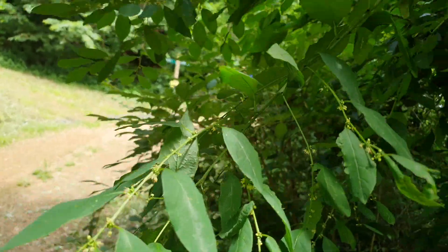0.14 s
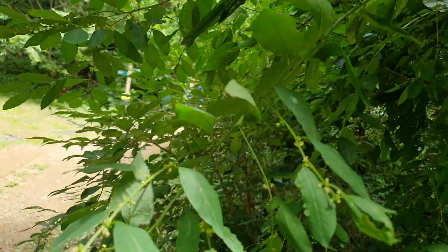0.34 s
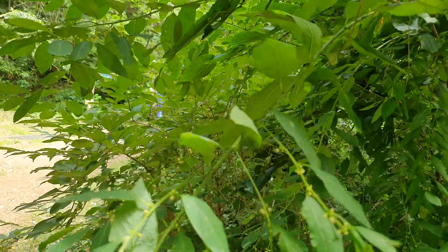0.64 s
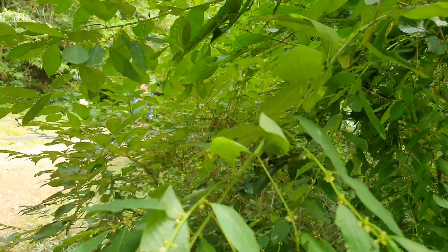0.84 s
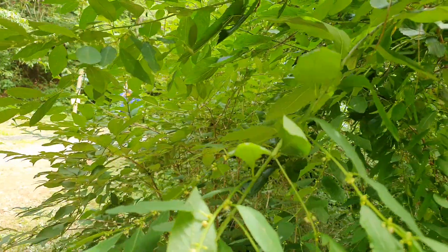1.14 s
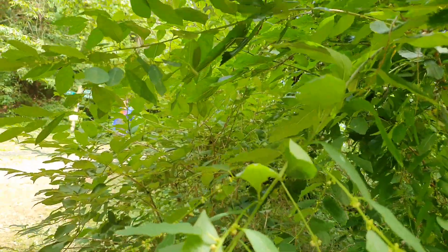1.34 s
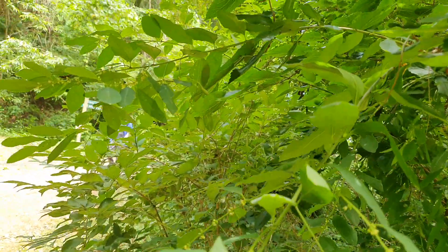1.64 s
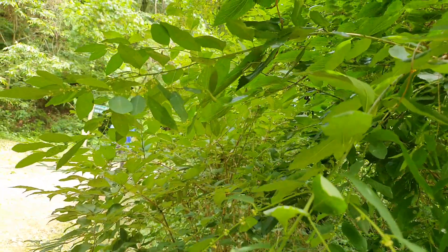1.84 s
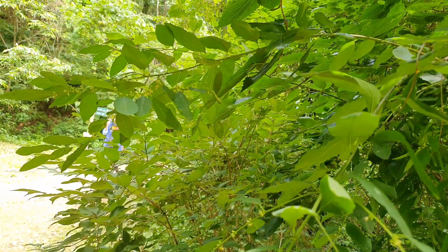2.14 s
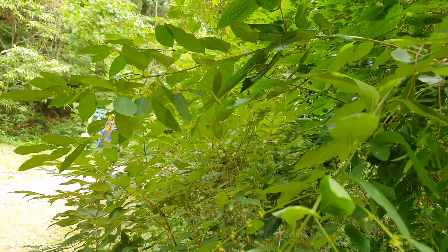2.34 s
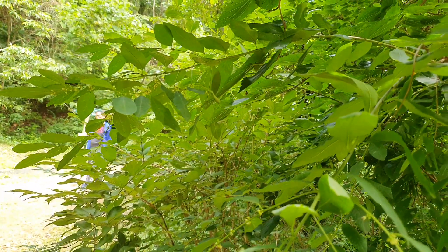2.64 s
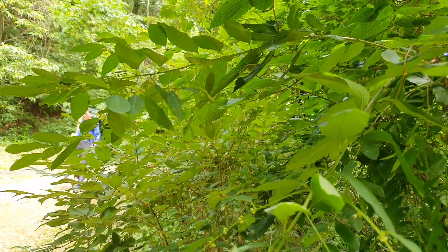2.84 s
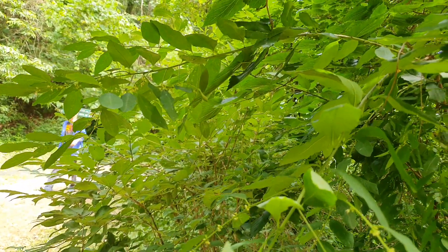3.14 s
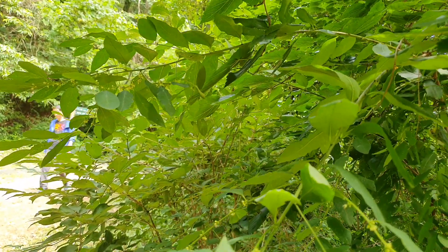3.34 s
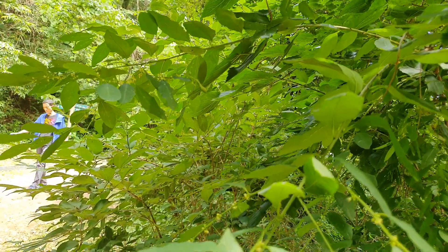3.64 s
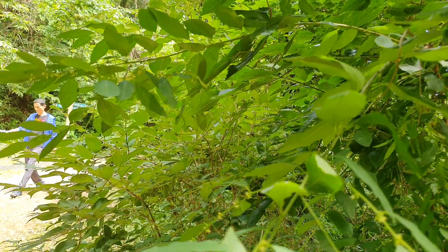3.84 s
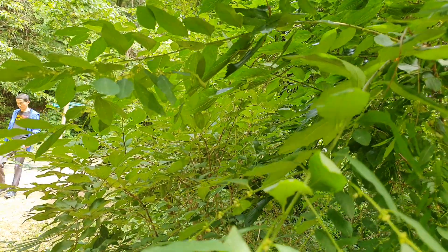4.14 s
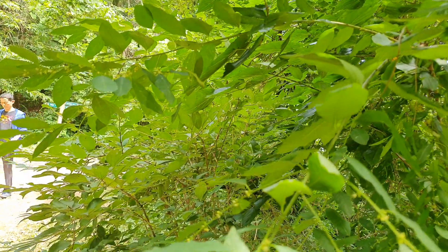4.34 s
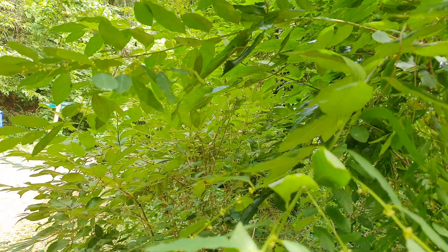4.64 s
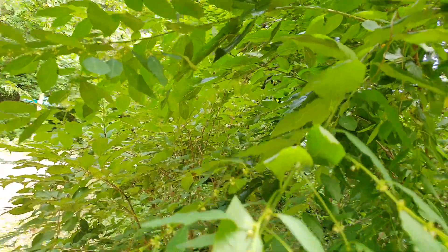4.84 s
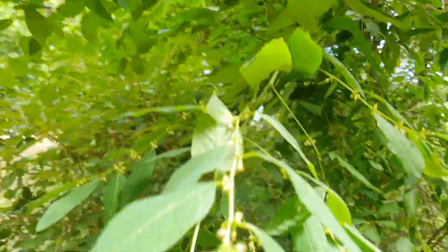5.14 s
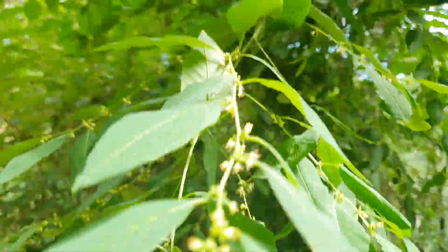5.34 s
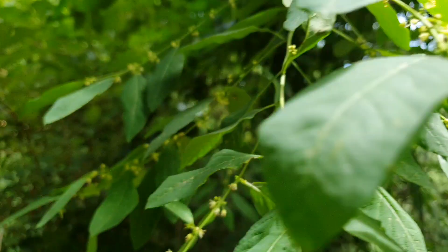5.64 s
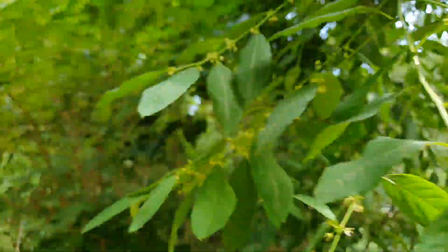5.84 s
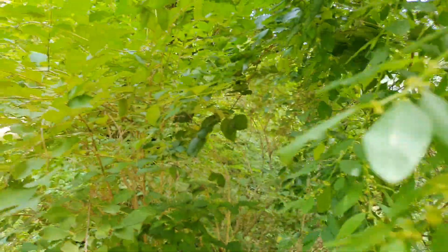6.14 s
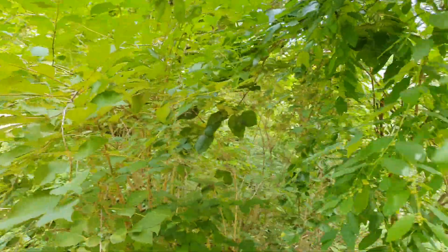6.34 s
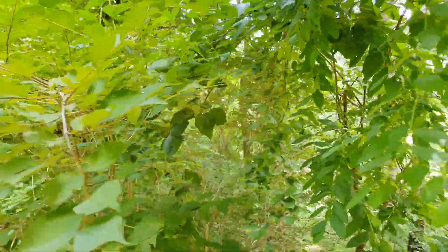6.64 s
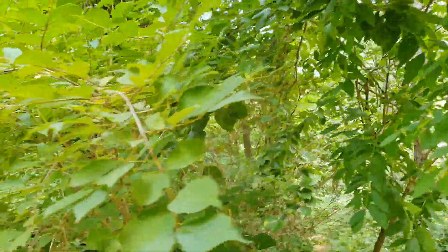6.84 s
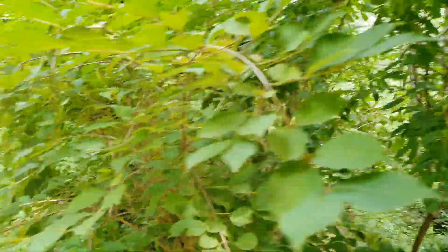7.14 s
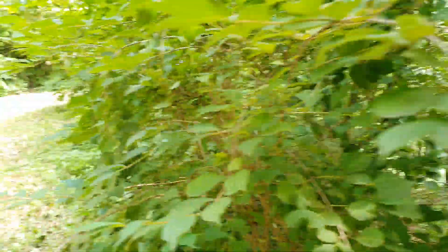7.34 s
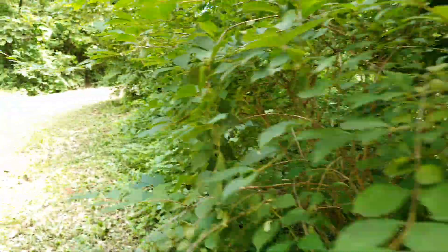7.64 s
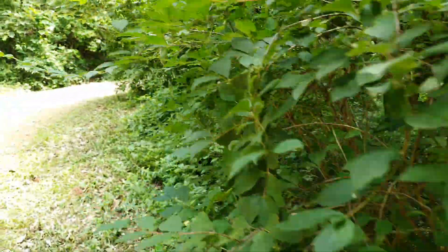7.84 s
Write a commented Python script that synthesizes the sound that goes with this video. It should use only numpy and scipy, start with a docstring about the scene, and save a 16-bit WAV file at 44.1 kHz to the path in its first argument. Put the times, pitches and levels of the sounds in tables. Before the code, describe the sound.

In a summer wood, far cicadas drone steadily at several pitches while one nearby, to the left of the microphone, pulses with a fast, bright rattle. Brief high calls come from farther trees, and a distant road rumbles faintly. From about halfway, someone shifts on a dirt path with soft thuds, gritty scuffs and cracking twigs. The close cicada tires and slows at the end.

```python
"""A cicada close on the left rattles in quick beats over its own buzz, clicking its ribbed timbals and
pumping its hollow abdomen; near the end it tires and slows. Around it the summer wood drones with a far
chorus, a thin trill and short calls, over the low rumble of a distant road. Mostly in the second half,
the listener shifts on the dirt path: soft scuffs and footfalls, grit and snapping twigs."""
import sys
import numpy as np
from scipy import signal
from scipy.fft import rfft, irfft, next_fast_len
from scipy.io import wavfile

SR = 44100
rng = np.random.default_rng(int(sys.argv[2]) if len(sys.argv) > 2 else 0)


def transcribe(signal):
    """Save signal, clipped to [-1, 1], as a 16-bit WAV file at the path in sys.argv[1]."""
    frames = np.atleast_2d(signal).T
    limited = np.clip(frames, -1, 1)
    pcm = np.round(limited * 32767).astype(np.int16)
    wavfile.write(sys.argv[1], SR, pcm)


N = 353241


# Rattle resonances; pan is always left minus right: f/Hz, width/Hz, relative level/dB, pan/dB
RATTLE_MODES = [(3730, 470, -8.5, 1), (5520, 610, -8.5, 9), (7750, 180, -9, 22), (8500, 180, -6.5, 18),
                (11530, 1500, -9.5, 5), (12100, 820, -13.5, 10.5), (14100, 920, -18, 15)]
# Rattle held before the beats begin and under the last, slowing beats:
# centre t/s, length/s, relative level/dB
HELD_RATTLE = [(0.07, 0.24, -54), (7.802, 0.59, -51.5)]
# Fader on the 8 kHz ring, which depends on where the listener stands: t/s, relative level/dB
RING_FADER = [(0, -17), (1, -4), (2, -6), (3, -5.5), (4.8, -5.5), (5.3, 3.5), (6.3, -3), (7.4, -1), (8, -9)]
# Resonances of the unbroken buzz: f/Hz, width/Hz, relative level/dB, pan/dB
BUZZ_BANDS = [(5665, 290, -89.5, 10.5), (7804, 588, -82.5, 16.5), (11210, 1300, -92, 6),
              (13500, 1800, -101, 15)]
# Fader on the buzz: t/s, gain/dB
BUZZ_FADER = [(0, 3.5), (.15, 3.5), (.3, 0), (.75, -0.4), (1, 1), (4.7, 0), (5.5, 1), (6.8, -1.2), (8, 0)]
def near_cicada(beats, rattle_db=-3.0, ring_db=-4.5, ring_hz=8230, ring_width_hz=520, ring_pan_db=14):
    """Over a steady buzz, each beat swells a bright rattle and sets the timbals ringing."""
    pump = pumping(beats, rise_s=0.0095, fall_s=0.011, echo_db=-9.0, echo_t60=0.19)
    clicks = timbals(click_hz=478, jitter=0.12, direct=0.2, sharpness=2.4)
    rattle = np.hypot(pump, held(HELD_RATTLE)) * amp(rattle_db) * unit(resonate(clicks, RATTLE_MODES))
    clicks = timbals(click_hz=462, jitter=0.11, direct=0.23, sharpness=1.3)
    ring_mode = [(ring_hz, ring_width_hz, 0, ring_pan_db)]
    ring = pump * amp(curve(RING_FADER) + ring_db) * unit(resonate(clicks, ring_mode))
    clicks = timbals(click_hz=233.3, jitter=0.043, direct=0.22, sharpness=1.0)
    buzz = amp(curve(BUZZ_FADER) + 0.26 * wobble(25)) * resonate(clicks, BUZZ_BANDS)
    return foliage(rattle + ring + buzz)


def timbals(click_hz, jitter, direct, sharpness):
    """Buckling timbal ribs click; a share of the power arrives direct, the rest as hiss off the leaves."""
    phase = np.cumsum(click_hz * (1 + jitter * wobble(90))) / SR
    decay = np.exp(-sharpness * (phase % 1))
    clicks = unit(decay * amp(2.0 * wobble(300)) * rng.standard_normal(N))
    return np.sqrt(direct) * both_ears(clicks) + np.sqrt(1 - direct) * rng.standard_normal((2, N))


def beat_series(first_pair_s=0.4832, pair_s=0.15045, weak_lag_s=0.0755, strong_db=-44, weak_db=-44.5):
    """Strong-weak pairs of beats that slow as the cicada tires: rows of t/s, relative level/dB."""
    beats = [(0.248, strong_db)]  # one lone beat leads in
    s = first_pair_s
    while s < N / SR:
        stretch_s = 0.001651 * s + 0.08032 * np.exp((s - 8.0) / 0.853)  # slow creep, then a steep drag
        strong_scatter_db, weak_scatter_db = 0.6 * rng.standard_normal(2)
        beats.append((s, strong_db + strong_scatter_db))
        # the weak beat falls later and fades as the period stretches
        beats.append((s + weak_lag_s + 0.17 * stretch_s, weak_db - 38 * stretch_s + weak_scatter_db))
        s += pair_s + stretch_s
    return beats


def pumping(beats, rise_s, fall_s, echo_db, echo_t60):
    """Envelope of the abdomen's beats, each given a tail by the trees."""
    t = np.arange(-SR // 20, SR // 5) / SR
    swell = np.exp(-(t / np.where(t < 0, rise_s, fall_s)) ** 2)
    echo = amp(echo_db - 60 * np.abs(t) / echo_t60) ** 2 * np.clip(t / fall_s, 0, 1)
    power = np.zeros(N)
    for s, db in beats:
        add(power, s + t[0], amp(db) ** 2 * (swell + echo))
    return np.sqrt(power)


def foliage(x, depth_db=3.5, step_hz=45, places=5):
    """Paths off leaves and ground interfere: a fine spectral ripple that shifts as the listener moves."""
    out = np.zeros((2, N))
    for place in np.eye(places):
        knots = rng.standard_normal((2, int(SR / step_hz)))
        ripple = lambda f: np.array([np.interp(f / step_hz, np.arange(len(k)), k) for k in knots])
        crossfade = np.interp(np.arange(N), np.linspace(0, N, places), place)
        out += filtered(x, lambda f: unit(amp(depth_db * ripple(f)))) * crossfade
    return out


def both_ears(x, lag_s=0.00036):
    """The near cicada's direct sound reaches the right ear late."""
    return np.array([x, np.roll(x, round(lag_s * SR))])


# Fader on the chirp under each beat: t/s, relative level/dB
CHIRP_FADER = [(0, -11), (.8, -9), (6.7, -8.5), (8, -19)]
def chirps(beats, gain_db=-4.0, pan_db=-1.0, pitch_hz=2790, drift_hz=14, scatter_db=-3):
    """The hollow abdomen sounds a short low note at every beat; the leaves scatter part of it."""
    pump = pumping(beats, rise_s=0.017, fall_s=0.0084, echo_db=-7, echo_t60=0.15)
    pitch = pitch_hz + drift_hz * wobble(15)
    scattered = np.array([whistle(pitch, blur_hz=54.7) for ear in range(2)])
    note = unit(both_ears(whistle(pitch, blur_hz=42)) + amp(scatter_db) * scattered)
    swell_db = np.cos(2 * np.pi * (np.arange(N) / SR - 0.64) / 1.8)  # 1 dB up and down every 1.8 s
    return pump * amp(curve(CHIRP_FADER) + gain_db + swell_db) * sides(pan_db) * note


# Drone bands of the far chorus: f/Hz, width/Hz, density/(dB per Hz), pan/dB
CHORUS_BANDS = [(2650, 404, -85.5, -0.5), (3250, 680, -83, -2), (4800, 640, -97, -21.5),
                (5210, 874, -83.5, -0.5), (6300, 840, -99.5, 17), (8240, 320, -92.5, -7),
                (11600, 1300, -95.5, -1)]
# Fader on the chorus: t/s, relative level/dB
CHORUS_FADER = [(0, 2), (5.2, 2), (6.6, 0.5), (8, 1)]
def chorus(sway_db=0.93):
    """Many far cicadas merge into droning bands that sway a little."""
    fader_db = curve(CHORUS_FADER)
    sway = sway_db * np.array([wobble(5.1), wobble(12)])
    return amp(fader_db - fader_db.mean() + sway) * resonate(rng.standard_normal((2, N)), CHORUS_BANDS)


# Swells that lift the trill out of the chorus: centre t/s, length/s, level/dB
TRILL_PHRASES = [(1.8, .2, -55.5), (3.06, .18, -56.5), (3.36, .08, -56.5), (4.96, .14, -55.5),
                 (5.95, 0.099, -55), (6.57, .08, -55), (7.17, 0.16, -56.5), (7.96, .08, -56)]
def trill(bed_db=-64, pan_db=-3, fade_db=4, pitch_hz=3380, drift_hz=35):
    """A thin, far trill wavers and swells in phrases; each ear gets its own blur and flutter."""
    bed = amp(bed_db + fade_db * np.tanh(wobble(7)))
    pitch = pitch_hz + drift_hz * wobble(9)
    voice = np.array([amp(3.3 * wobble(70)) * whistle(pitch, blur_hz=30.25) for ear in range(2)])
    return np.hypot(bed, held(TRILL_PHRASES)) * sides(pan_db) * voice


# Louder calls from farther trees: centre t/s, length/s, f/Hz, width/Hz, level/dB, pan/dB
TREE_CALLS = [(0.377, 0.078, 3254, 55, -43.5, 4), (0.574, .23, 3420, 350, -54, 0),
              (1.364, 0.11, 3240, 40, -52, -1), (1.47, .23, 3420, 250, -55, -4),
              (1.628, 0.13, 3100, 50, -54, -2), (2.329, .4, 3330, 500, -52, -4),
              (3.58, .25, 3400, 420, -49.5, -1), (4.277, 0.28, 3140, 376, -53, -7),
              (4.701, 0.13, 3600, 280, -53, -7), (5.367, 0.13, 3250, 45, -53.5, -3),
              (5.527, 0.28, 3500, 260, -55.5, -3), (6.2, 0.4, 3200, 350, -53.5, 1)]
def far_calls(crisp_db=-37):
    """Short shrill notes, smeared by the wood into narrow bands; fainter calls have softer edges."""
    out = np.zeros((2, N))
    for s, length, hz, width, db, pan in TREE_CALLS + faint_calls():
        n = int(length * SR)
        note = unit(filtered(rng.standard_normal((2, n)), lambda f: hump(f, hz, width)))
        taper = np.clip(0.46 * (crisp_db - db) / 12, 0.1, 1)
        add(out, s - length / 2, amp(db) * sides(pan) * note * signal.windows.tukey(n, taper))
    return out


def faint_calls(count=12, length_s=0.15, pitch_hz=3320, width_hz=60, level_db=-57.5, pan_db=-3):
    """Weaker singers take turns at loose intervals, each a little different: rows like TREE_CALLS."""
    turns = (np.arange(count) + rng.random(count)) * N / SR / count
    return [(s, length_s * amp(2 * length), pitch_hz + 130 * pitch, width_hz * amp(6.4 * width),
             level_db + level, pan_db + 3 * pan)
            for s, (length, pitch, width, level, pan) in zip(turns, rng.standard_normal((count, 5)))]


# Scuffs on dirt and brushes of leaves: centre t/s, length/s, f/Hz, level/dB
SOLE_SCUFFS = [(4.448, 0.061, 780, -66.5), (5.043, .11, 1700, -62.5), (5.499, 0.058, 1170, -52.5),
               (5.673, 0.1, 1100, -63), (5.889, .015, 800, -58), (6.078, 0.065, 1280, -60.5),
               (6.08, .035, 10000, -53), (6.185, 0.051, 1930, -59.5), (6.485, .04, 1320, -59),
               (6.827, 0.15, 2660, -55.5), (7.514, 0.052, 684, -62)]
def scuffs(log_width=0.61, clump_db=3.5):
    """A sole drags over grit: clumps of tiny grains in a broad band."""
    out = np.zeros((2, N))
    clumps = amp(clump_db * wobble(350))
    for s, length, hz, db in SOLE_SCUFFS:
        n = int(2 * length * SR)
        grains = wide_noise(n) * np.roll(clumps, -int(s * SR))[:n]
        rub = unit(filtered(grains, lambda f: np.exp(-(np.log((f + 1) / hz) / log_width) ** 2 / 2)))
        add(out, s - length, amp(db) * rub * np.hanning(n))
    return out


# Twigs breaking underfoot: t/s, level/dB, knock f/Hz
TWIG_SNAPS = [(.59, -53, 1300), (4.786, -48, 1830), (5.007, -41, 2040), (5.299, -44.5, 1720),
              (5.476, -39, 990), (5.489, -39, 855), (5.502, -37, 1500), (5.727, -39, 1260),
              (5.868, -44, 1400), (5.885, -40.5, 402), (6.068, -42, 1900), (6.258, -29, 1004),
              (6.458, -40.5, 1390), (6.911, -42, 1870), (7.4, -46.5, 586), (7.497, -37.5, 594),
              (7.523, -44.5, 695)]
def snaps(wood_t60=0.013, crack_db=-1.5, crack_t60=0.042, fibres_db=4, hardness=0.65, attack_s=0.00021):
    """Dry twigs give way: a short woody knock and a crackle of fibres, brighter the harder the break."""
    out, t = np.zeros((2, N)), np.arange(SR // 16) / SR
    hardest_db = max(db for s, db, hz in TWIG_SNAPS)
    ear_phase = np.array([[1], [-1]]) * np.pi / 8  # the knock meets the ears slightly out of step
    for s, db, hz in TWIG_SNAPS + grit_ticks():
        phase = 2 * np.pi * hz * t
        wood = np.sin(phase + ear_phase) + 0.42 * np.sin(1.32 * phase + ear_phase)
        knock = wood * amp(-60 * t / wood_t60)
        flicker = amp(fibres_db * np.sin(np.cumsum(rng.normal(0, 0.16, len(t)))))
        fibres = flicker * rng.standard_normal((2, len(t)))
        crackle = unit(filtered(fibres, lambda f: f / np.hypot(f, 6000)))  # high-pass at 6 kHz
        crack = amp(crack_db + hardness * (db - hardest_db) - 60 * t / crack_t60) * crackle
        add(out, s, amp(db) * (knock + crack) * (1 - np.exp(-t / attack_s)))
    return out


# Soft footfalls: t/s, level/dB, f/Hz
FOOTFALLS = [(0.548, -53, 302), (5.58, -51, 200), (5.656, -48, 215), (5.818, -45, 110), (6.067, -42, 90),
             (6.22, -45, 214), (7.42, -40.5, 54.7)]
def footfalls(t60=0.057, attack_s=0.00076):
    """Weight settles on the soft ground with a low, damped thud."""
    out, t = np.zeros(N), np.arange(SR // 5) / SR
    for s, db, hz in FOOTFALLS:
        envelope = amp(db - 60 * t / t60) * (1 - np.exp(-t / attack_s))
        add(out, s, envelope * np.sin(2 * np.pi * hz * t))
    return out


# Grit and dry leaves stirring underfoot: t/s, level/dB
LITTER_STIR = [(0, -84.5), (.6, -64.5), (1.1, -76), (4.3, -78), (4.9, -68.5), (6.2, -64), (7, -68),
               (7.6, -60.5), (8, -65)]
# Colour of the crackle: f/Hz, width/Hz, relative level/dB, pan/dB
LITTER_BANDS = [(480, 350, -1, -1), (804, 89, -9, 12), (1880, 1700, 1.5, -1.5)]
def litter(spiky_db=4.0):
    """Grit and dry leaves on the path stir in a fine crackle."""
    grains = amp(spiky_db * wobble(260)) * wide_noise(N)
    return amp(curve(LITTER_STIR)) * unit(resonate(grains, LITTER_BANDS, low_cut_hz=200))


def grit_ticks(count=16, over_litter_db=17, pitch_hz=1000, ceiling_db=-47):
    """Small stones tick at random, more often and louder where the litter stirs: rows like TWIG_SNAPS."""
    stir_db = curve(LITTER_STIR)
    chance = np.cumsum(np.sqrt(amp(stir_db)))
    onsets = np.searchsorted(chance, chance[-1] * rng.random(count))
    return [(i / SR, min(stir_db[i] + over_litter_db, ceiling_db) + scatter_db, pitch_hz * amp(3 * detune))
            for i, (scatter_db, detune) in zip(onsets, rng.standard_normal((count, 2)))]


# EQ of the road's rumble: f/Hz, relative level/dB
ROAD_EQ = [(53, -68), (90, -15.5), (124, -0.5), (178, -2), (202, -4.5), (242, -16), (281, -10),
           (346, -25.5), (450, -39), (580, -71), (990, -120)]
# Far vehicle pass-bys: nearest t/s, time to half power/s, level/dB
PASS_BYS = [(0.25, 0.27, -62.5), (3.1, 0.57, -56)]
def road(steady_db=-63.5, hum_hz=72, hum_db=-71):
    """A distant road rumbles and faintly hums; the rumble swells as vehicles pass."""
    t = np.arange(N) / SR
    passing_power = sum(amp(db) ** 2 / (1 + ((t - s) / half_s) ** 2) for s, half_s, db in PASS_BYS)
    rumble = np.sqrt(amp(steady_db) ** 2 + passing_power) * unit(diffuse(ROAD_EQ))
    hum_level = amp(hum_db + 2.4 * wobble(2.85))
    hum = unit(np.sin(2 * np.pi * hum_hz * t + 1.8 * wobble(4.4)))
    return rumble + hum_level * hum


# Air tone of the wood: f/Hz, density/(dB per Hz)
AIR_TONE = [(20, -106), (40, -95), (58, -84), (73, -79.5), (95, -86.5), (200, -90.5), (400, -105),
            (750, -100.5), (1000, -104), (1400, -102), (2000, -101), (4000, -112)]
def still_air():
    """A faint, dark bed of noise among the trees."""
    return diffuse(AIR_TONE)


# Stereo image of the ambience: f/Hz, left-right correlation (1 is mono)
EAR_LIKENESS = [(30, 0.62), (70, 0.88), (140, 0.97), (300, 0.94), (600, 0.24), (1200, 0), (3000, 0)]
def diffuse(colour):
    """Noise from all around: alike at both ears in the bass only."""
    def mid_side_gain(f):
        angle = np.arccos(along(EAR_LIKENESS, f)) / 2
        return amp(along(colour, f)) * np.sqrt(SR / 2) * np.array([np.cos(angle), np.sin(angle)])
    mid, side = filtered(rng.standard_normal((2, N)), mid_side_gain)
    return np.array([mid + side, mid - side])


def resonate(x, modes, low_cut_hz=2150):
    """Play white excitation through panned resonances; small bodies radiate no bass."""
    def response(f):
        power = sum((amp(db) * sides(pan) * hump(f, hz, width)) ** 2 for hz, width, db, pan in modes)
        return np.sqrt(power * SR / 2 / (1 + (low_cut_hz / (f + 1)) ** 20))
    return filtered(x, response)


def whistle(pitch_hz, blur_hz):
    """A sine of rms 1 on a pitch curve, slightly blurred."""
    return unit(np.sin(2 * np.pi * np.cumsum(pitch_hz + blur_hz * wobble(150)) / SR))


def wide_noise(n):
    """White noise, half centred and half separate at each ear."""
    return rng.standard_normal(n) + rng.standard_normal((2, n))


def held(notes):
    """Soft-edged envelope of held notes: centre t/s, length/s, level/dB."""
    t = np.arange(N) / SR
    return sum(amp(db) * np.exp(-(2 * (t - s) / length) ** 4) for s, length, db in notes)


def wobble(rate):
    """A smooth random curve, rate knots a second."""
    count = int(N * rate / SR) + 4
    fine = signal.resample(rng.standard_normal(count), 16 * count)
    return np.interp(np.linspace(0, len(fine) - 1, N), np.arange(len(fine)), fine)


def curve(rows):
    """Join (t/s, value) points into one value per sample."""
    return np.interp(np.arange(N) / SR, *np.transpose(rows))


def along(points, hz):
    """Read (f/Hz, value) points on a log frequency axis."""
    f, values = np.transpose(points)
    return np.interp(np.log(hz + 1), np.log(f), values)


def filtered(x, response):
    """Zero-phase EQ with gain response(f)."""
    n = x.shape[-1]
    padded = next_fast_len(n + 4096)
    return irfft(rfft(x, padded) * response(np.fft.rfftfreq(padded, 1 / SR)), padded)[..., :n]


def hump(f, hz, width):
    """Gain of a steep-sided resonance."""
    return 1 / (1 + ((f - hz) / width) ** 2 * np.sqrt(2))


def sides(pan_db):
    """Left and right gains; positive pans left."""
    return amp([[pan_db / 2], [-pan_db / 2]])


def amp(db):
    """Decibels to gain."""
    return 10 ** (np.asarray(db) / 20)


def unit(x):
    """Scale to rms 1."""
    return x / np.sqrt(np.mean(x ** 2) + 1e-20)


def add(track, s, sound):
    """Mix a sound into a track from time s on."""
    start = max(round(s * SR), 0)
    part = track[..., start:start + sound.shape[-1]]
    part += sound[..., :part.shape[-1]]


def scene():
    """Insects above, feet below, road and air behind."""
    beats = beat_series()
    insects = near_cicada(beats) + chirps(beats) + chorus() + trill() + far_calls()
    feet = scuffs() + snaps() + footfalls() + litter()
    return insects + feet + road() + still_air()


def record(dry, top_hz=15800):
    """A brick-wall low-pass takes off the very top."""
    return filtered(dry, lambda f: f < top_hz)


dry = scene()
out = record(dry)
transcribe(out)
```